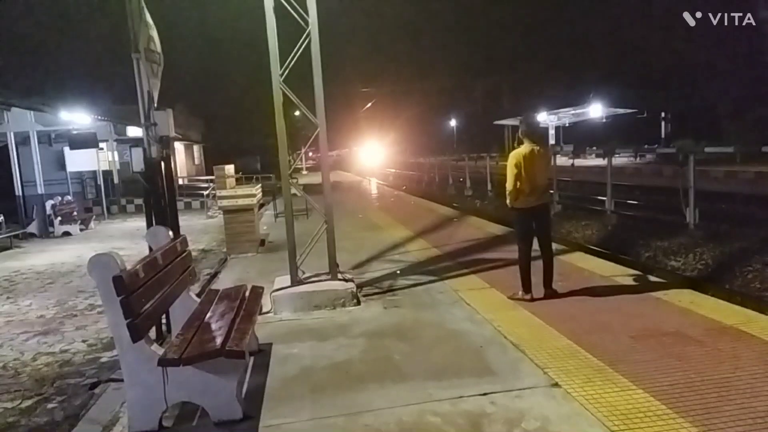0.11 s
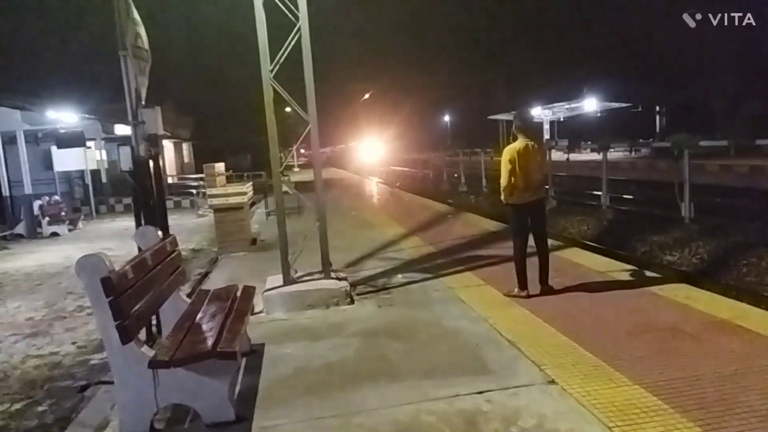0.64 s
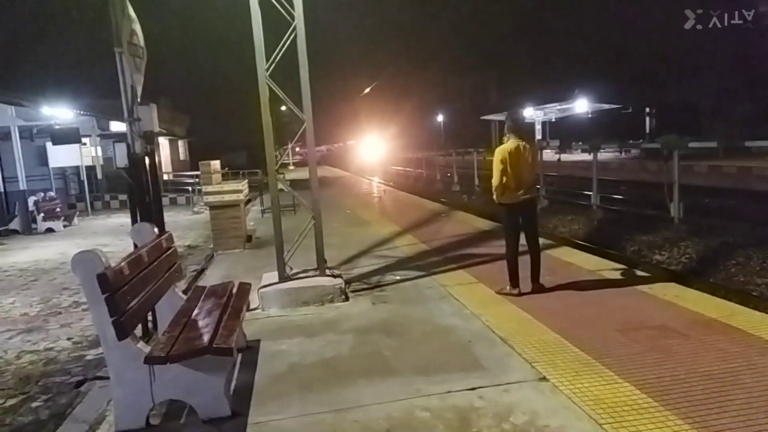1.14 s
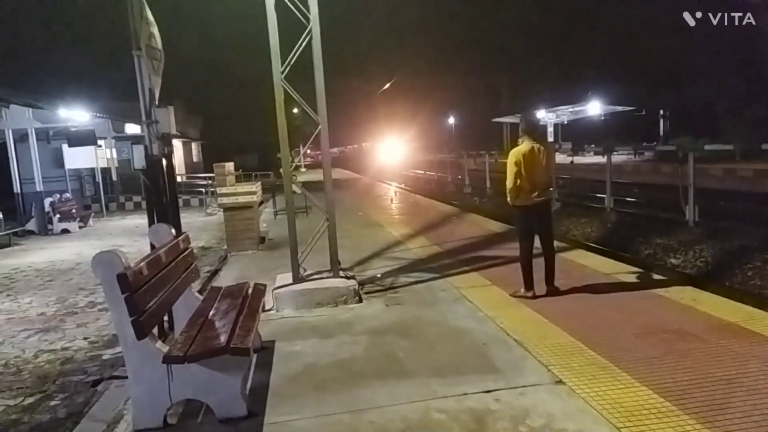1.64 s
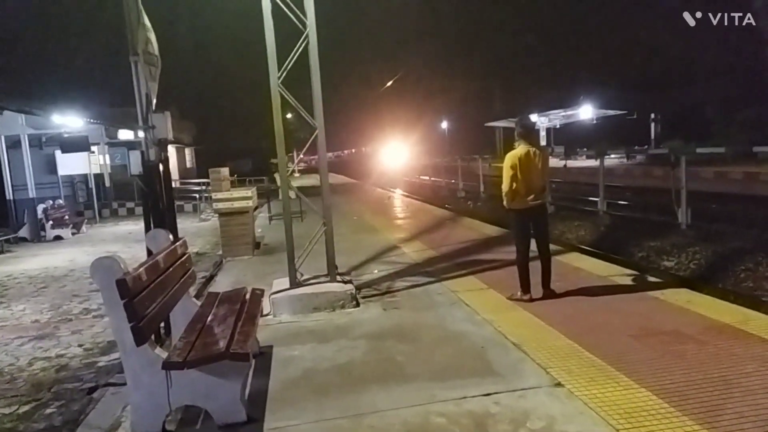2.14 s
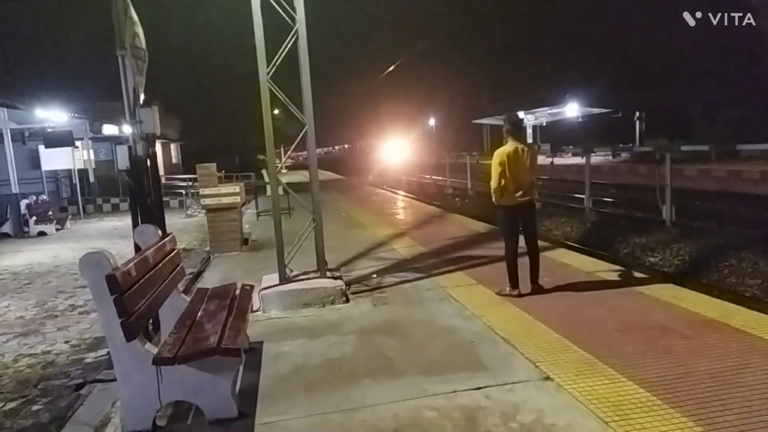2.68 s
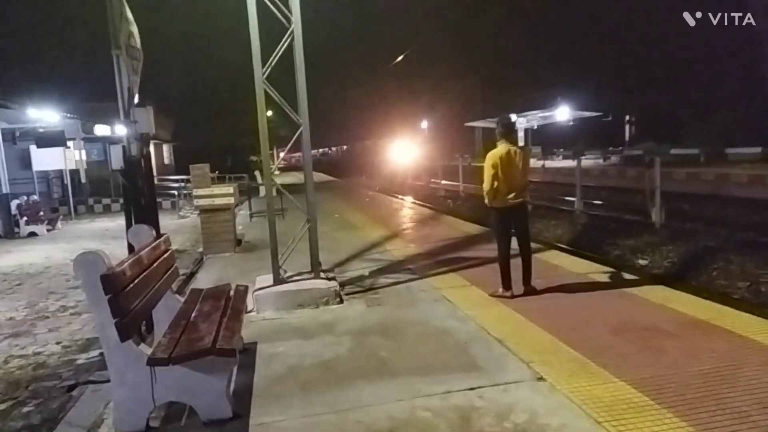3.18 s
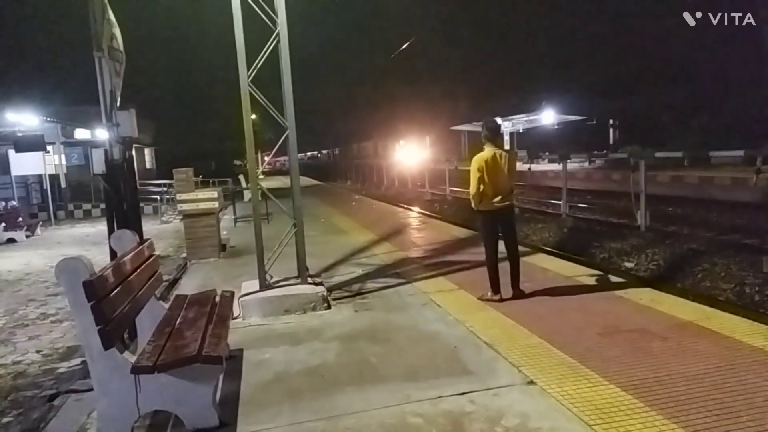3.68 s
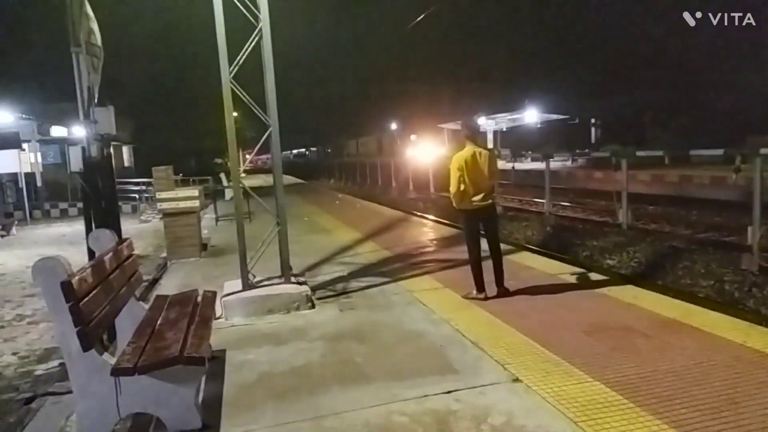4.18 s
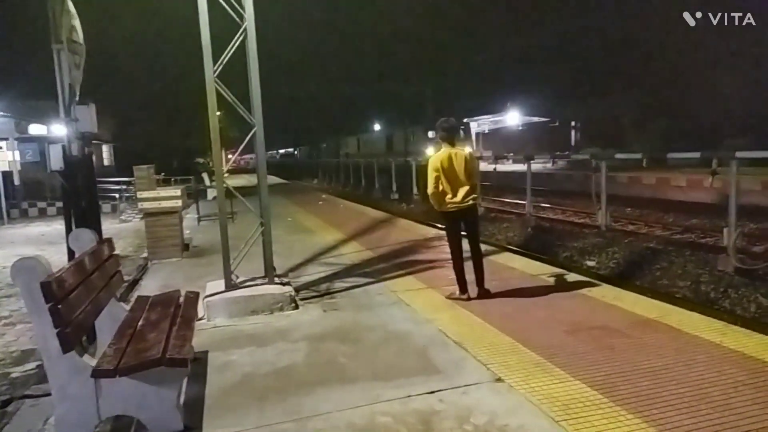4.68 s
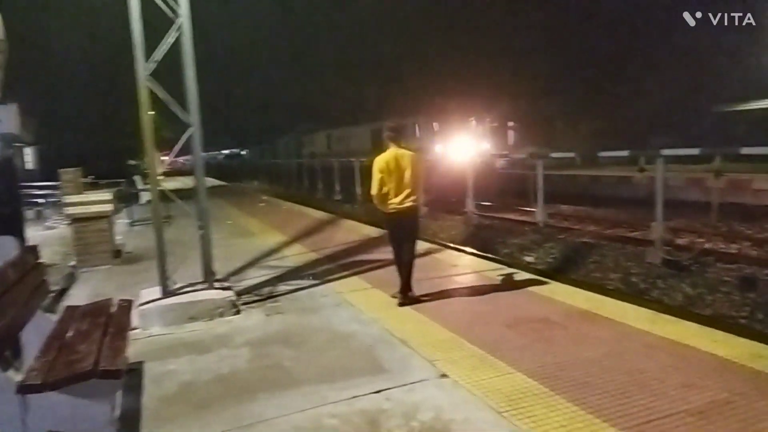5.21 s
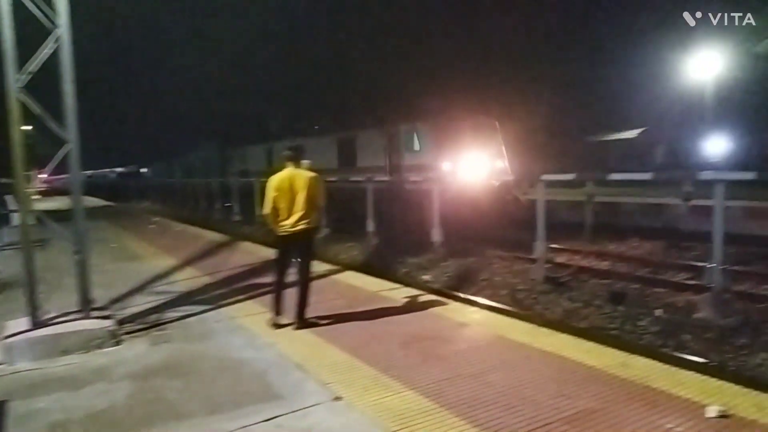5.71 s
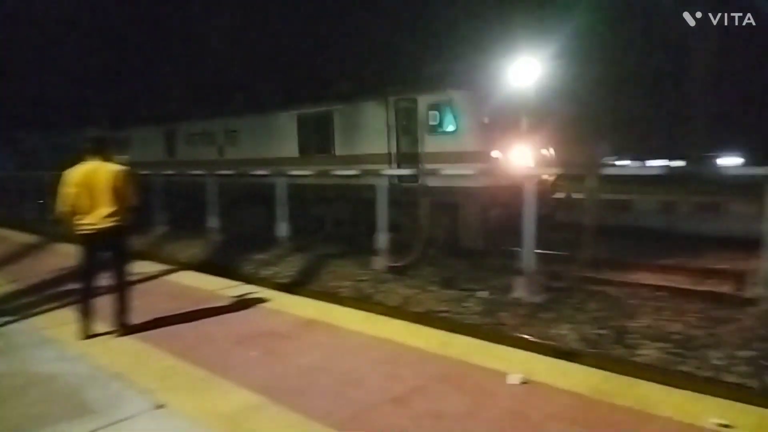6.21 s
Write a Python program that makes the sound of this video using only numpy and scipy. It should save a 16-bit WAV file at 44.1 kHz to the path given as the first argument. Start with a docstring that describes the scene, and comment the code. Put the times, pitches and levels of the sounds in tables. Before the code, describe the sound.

After a tiny silence, a night platform is heard: soft hiss, low rumble, a faint fading hum and narrow high crickets throbbing about eleven times a second. At 0.25 s a train horn begins to speak, with a small dull click near 0.33 s. By 0.6 s it is a round, mellow note a little above 300 Hz, sagging in level around 1.6 s and recovering. At about 1.9 s it snaps wide open: bright, brassy and sharp, briefly gritty until 2.4 s. The crickets and hiss are buried. The steady blast holds to 6 s, its overtones shimmering, swelling and dipping separately with wide open-air echoes. The train's rolling noise and wheel rumble build, especially after 5 s. Around 6.05 s the brass edge drops away, leaving a mellower note, with a brief rumble surge near 6.3 s as the sound ends mid-approach.

```python
"""A locomotive's air horn, from a station platform at night as the train rolls in: first half open, round and
mellow, then wide open, brassy and sharp. It is built from partials in step, one slap of the diaphragm a cycle;
echoes from track, fence and roofs make every overtone swell and fade on its own. Crickets (throbbing narrow
hiss), a fading station hum (a sine) and night hiss lie underneath, with a low rumble. The rolling noise of the
train, banded noise that follows its distance, grows at the end."""
import sys
import numpy as np
from scipy import signal
from scipy.io import wavfile
from scipy.ndimage import uniform_filter1d

SR = 44100
rng = np.random.default_rng(int(sys.argv[2]) if len(sys.argv) > 2 else 0)


def generate_wav(sig):
    """Save sig (samples, or channels by samples) to the path in sys.argv[1] as 16-bit PCM at SR."""
    pcm = np.round(np.clip(np.atleast_2d(sig).T, -1, 1) * 32767).astype(np.int16)
    wavfile.write(sys.argv[1], SR, pcm)


def level_to_linear(level):
    """Convert decibel levels to linear amplitude factors, elementwise."""
    exponent = np.asarray(level, float) / 20
    return 10 ** exponent


N = 279594
STEP = 64   # samples between points of the coarse time grid

# the horn's note as it is heard on the platform: time_s, pitch_hz
NOTE_PITCH = [(0.36, 320.2), (0.61, 315.3), (1.0, 313.4), (1.55, 317.6), (2.0, 309.3), (3.17, 308.5),
              (4.88, 307.8), (5.67, 307), (5.9, 304.9), (6.3, 314.2)]

VALVE_OPENS_S = 0.256   # the horn begins to speak, half open
WIDE_OPEN_S, CLOSING_S, VALVE_SWING_S = 1.86, 6.05, 0.044   # the valve is wide open between the first two
NEARING_S = 2.24   # time in which echo lags and their creep double as the train nears
SLIP_HZ = 0.1   # creep of the echo paths at the start, wavelengths of the note per s


def rms_one(x):
    """Scales a sound to rms 1."""
    return x / np.sqrt(np.mean(np.abs(x) ** 2) + 1e-20)


def band_rms_one(x, low_hz, high_hz):
    """Scales a sound so that one band of its mid has rms 1."""
    band = signal.sosfilt(signal.butter(4, [low_hz, high_hz], "band", fs=SR, output="sos"), x.mean(0))
    return x / np.sqrt(np.mean(band ** 2))


def seconds(step=1):
    """Time of every step-th sample."""
    return np.arange(0, N + step - 1, step) / SR


def in_time(rows, step=1):
    """Draws straight lines in time through the columns of a table that starts with seconds."""
    s, *columns = np.transpose(rows)
    return [np.interp(seconds(step), s, column) for column in columns]


def at_hz(points, hz):
    """Reads a table of (Hz, value) along log frequency."""
    table_hz, values = np.transpose(points)
    return np.interp(np.log(hz), np.log(table_hz), values)


def fine(coarse):
    """From the coarse time grid to every sample."""
    return np.interp(np.arange(N) / STEP, np.arange(len(coarse)), coarse)


def drift(rate_hz):
    """Slow complex chance on the coarse grid: noise through a double one-pole low-pass, rms 1."""
    r = np.exp(-2 * np.pi * rate_hz * STEP / SR)
    white = rng.standard_normal((2, N // STEP + 1002))
    slow = signal.lfilter([1], [1, -2 * r, r * r], white[0] + 1j * white[1])
    return rms_one(slow[1000:])   # the filter has settled


def flutter(width_hz, edge_hz):
    """Quick complex chance that falls off and then stops: it hugs a partial and leaves the gaps dark."""
    white = rng.standard_normal((2, N // STEP + 102))
    slope = signal.butter(2, width_hz, fs=SR / STEP, output="sos")
    edge = signal.butter(6, edge_hz, fs=SR / STEP, output="sos")
    return rms_one(signal.sosfilt(np.vstack([slope, edge]), white[0] + 1j * white[1])[100:])


def banded_noise(spectrum, patchy_db):
    """Half-octave bands of stereo noise, each with its own level, flicker and left-right likeness."""
    # how alike both channels hear the noise: frequency_hz, likeness (0-1)
    channel_likeness = [(30, .2), (60, 0.83), (150, 1), (1000, 0.82), (4000, 0.3), (15000, 0.76)]
    out = 0
    edges = 25 * 2 ** np.arange(0, 9.6, 0.5)
    white = rng.standard_normal((2, 2, N))   # neighbouring bands take turns
    for k, (low, high) in enumerate(zip(edges, edges[1:])):
        hz = np.sqrt(low * high)
        if not spectrum[0][0] <= hz <= spectrum[-1][0]:
            continue
        band = signal.butter(2, [low, high], "band", fs=SR, output="sos")
        mid, side = signal.sosfilt(band, white[k % 2])
        alike = np.clip(at_hz(channel_likeness, hz), 0, 1)
        gain = level_to_linear(at_hz(spectrum, hz) + patchy_db * fine(drift(6.3).real))
        out = out + gain * (np.sqrt(1 + alike) * mid + np.sqrt(1 - alike) * side * [[1], [-1]])
    return out


def hardness(step=STEP):
    """0 with the valve half open, 1 wide open."""
    t = seconds(step)
    return np.clip(np.minimum(t - WIDE_OPEN_S, CLOSING_S - t) / VALVE_SWING_S, 0, 1)


def nearness(step=STEP):
    """Starts at 1 and doubles steadily as the train comes in."""
    return 2 ** (seconds(step) / NEARING_S)


def train_closeness():
    """10 m over the train's distance, on a straight path past the listener."""
    pass_s, speed_m_per_s, track_m = 6.45, 18, 7   # when, how fast and how near it would pass
    return 10 / np.hypot(track_m, speed_m_per_s * (pass_s - seconds()))


def ducking_db():
    """The station sounds sink at once under the full blast and come back slowly."""
    depth_db, recovers_db_per_s = -42, 69
    climb = recovers_db_per_s * seconds()
    return np.minimum.accumulate(depth_db * hardness(step=1) - climb) + climb


def station_hum():
    """One pure station tone that fades."""
    hum_hz, start_db, fade_db_per_s = 446, -54, -8
    t = seconds()
    return level_to_linear(start_db + fade_db_per_s * t) * np.sqrt(2) * np.sin(2 * np.pi * hum_hz * t)


def night_hiss():
    """The hiss of the night: wide noise that lifts a little with the horn and sinks under the full blast."""
    # colour of the night air, relative: frequency_hz, density_db (per Hz)
    night_colour = [(140, -44), (240, -12), (359, -15), (451, -8.5), (1220, -15), (1360, -18.5),
                    (1860, -27.5), (4550, -22), (5720, -38), (6700, -26), (15800, -28.5)]
    band_db, lift_db = -48.5, 0.5   # level of the band 400-540 Hz; rise as the horn begins
    hiss = band_rms_one(banded_noise(night_colour, patchy_db=1.5), 400, 540)
    lift = lift_db * np.clip((seconds() - VALVE_OPENS_S) / 0.12, 0, 1)
    return level_to_linear(band_db + lift + ducking_db()) * hiss


def low_rumble():
    """Station rumble and the wheels' low noise, which grows as distance shrinks, added in power."""
    # colour of the rumble, relative: frequency_hz, density_db (per Hz)
    rumble_colour = [(15, -45), (25, -9), (59, -17), (92, -2.5), (144, -2.5), (204, -10), (260, 1.5),
                     (340, -73), (570, -120)]
    station_db, wheels_db = -48, -45   # level of the band 50-230 Hz; the wheels' at 10 m
    ducking_share = 0.29   # the station rumble sinks by this share of the ducking
    surge_s, surge_db, surge_half_s = 6.29, 6.9, 0.057   # the wheels' rumble surges once
    surge = level_to_linear(surge_db * np.exp(-((seconds() - surge_s) / surge_half_s) ** 2))
    steep = signal.butter(4, 300, fs=SR, output="sos")
    noise = band_rms_one(signal.sosfilt(steep, banded_noise(rumble_colour, patchy_db=2.0)), 50, 230)
    station = level_to_linear(station_db + ducking_share * ducking_db())
    wheels = level_to_linear(wheels_db) * train_closeness() * surge
    return np.hypot(station, wheels) * noise


def rolling_noise():
    """The train's middle noise: it grows faster than one over the distance and sinks under the full blast."""
    # colour of the rolling train, relative: frequency_hz, density_db (per Hz)
    rolling_colour = [(240, -49), (500, -15), (900, 5.5), (1500, -12.5), (3000, -15), (5000, -20.5),
                      (8000, -23), (15800, -43)]
    band_db = -45   # level of the band 400-540 Hz at 10 m, without ducking
    ducking_share, swell_power = 0.4, 1.5
    noise = band_rms_one(banded_noise(rolling_colour, patchy_db=1.5), 400, 540)
    return level_to_linear(band_db + ducking_share * ducking_db()) * train_closeness() ** swell_power * noise


def crickets(depth):
    """A throbbing hiss in one narrow wing resonance, its beat drifting a little."""
    level_db, wing_hz, width_hz, chirps_per_s = -47, 6730, 590, 11   # level without ducking
    edges = [wing_hz - width_hz / 2, wing_hz + width_hz / 2]
    wing = signal.butter(2, edges, "band", fs=SR, output="sos")
    hiss = signal.sosfilt(wing, rng.standard_normal((2, N)))
    beat = np.cumsum(chirps_per_s * (1 + 0.089 * fine(drift(1.6).real))) / SR
    throbbing = rms_one(hiss * (1 + depth * np.sin(2 * np.pi * beat)))
    return level_to_linear(level_db + ducking_db()) * throbbing


def tick():
    """One short dull click as the horn speaks: an impulse through two decays."""
    tick_s, peak_db = 0.3343, -14
    out = np.zeros(N)
    out[round(tick_s * SR)] = level_to_linear(peak_db)
    return signal.lfilter([1, -1], [1, -1.78, 0.79], out)


def ground_comb(k, hz, t):
    """The upside-down echo off the ground combs all partials but the first."""
    lag_cycles, height = 0.03715, 0.36   # lag at the start, in cycles of the note
    blur_hz = 5560   # rough ballast scatters the echo more and more towards and above this
    from_s, grows_s = 2.18, 1.0   # the echo sets in as the track straightens
    grown = np.clip((t - from_s) / grows_s, 0, 1)
    bounce = height * grown * (k > 1) * np.exp(-hz / blur_hz)[:, None]
    return np.abs(1 - bounce * np.exp(-2j * np.pi * k * lag_cycles * nearness()))


def low_partial_levels(note_db, edge_db, hard, t):
    """Partials 1-5 in dB: blends of note and brass edge, each with swells and dips of its own."""
    # 2nd to 5th partial: share of the note (0-1), half_open_db, wide_open_db
    low_blends = [(0.7, -2.5, -0.5), (0.81, -15.5, -6.5), (0.83, -17.5, -7.5), (0.39, -13.5, -6.5)]
    # one low partial swells or dips for a while: centre_s, partial number, change_db, half_length_s
    partial_swells = [(0.466, 4, -11, 0.12), (1.318, 3, -28, 0.043), (1.48, 2, -2, 0.31),
                      (1.534, 4, -12, 0.13), (1.83, 3, 8.5, 0.058), (2.012, 5, -14, 0.072),
                      (2.072, 4, -10.5, 0.027), (2.19, 5, -2, 0.26), (2.258, 2, -1, 0.1),
                      (2.917, 4, -5.5, 1), (3.126, 1, 2, 0.067), (3.203, 2, -8.5, 0.46),
                      (3.434, 4, -2, 0.28), (3.595, 1, -4.5, 0.07), (3.817, 1, 1.5, 0.02),
                      (4.043, 3, -8.5, 0.23), (4.103, 2, -15.5, 0.37), (4.26, 4, -6, 0.54),
                      (4.543, 2, 2, 0.027), (4.65, 3, 6, 0.2), (4.796, 5, 4.2, 0.37), (5.022, 3, -4, 0.085),
                      (5.07, 2, -16, 0.33), (5.32, 3, 1.5, 0.32), (5.797, 3, -32, 0.028),
                      (5.813, 4, 5, 0.64), (5.926, 2, 6, 0.18), (6.018, 5, 8, 0.14), (6.161, 3, 1.5, 0.94),
                      (6.273, 1, -38, 0.01)]
    low = [note_db]
    for share, half, wide in low_blends:
        blend = share * note_db + (1 - share) * edge_db
        low.append(blend + half + (wide - half) * hard)
    for s, partial, db, length in partial_swells:
        i = round(partial) - 1
        low[i] = low[i] + db * np.exp(-((t - s) / length) ** 2)
    return np.array(low)


def brass_colour(hz, hard):
    """Relative heights of the upper partials, from mellow to brassy as the valve opens, dulled by far air."""
    # valve half open, relative: frequency_hz, level_db
    mellow_colour = [(1890, -0.5), (2200, -6), (3140, -7), (3450, -13), (3770, -66), (4400, -16),
                     (5030, -28), (6000, -18.5), (6600, -15.5), (7300, -27), (8500, -28), (9800, -19.5),
                     (11700, -21.5), (15700, -27)]
    # valve wide open, relative: frequency_hz, level_db
    brassy_colour = [(1000, -34), (1700, -6.5), (2130, -2.5), (2490, -4.5), (3150, -4.5), (3900, -11),
                     (4660, -6), (5990, -11), (6890, -9.5), (7490, -16), (8460, -8.5), (11900, -9),
                     (15800, -16)]
    air_loss_db = -5   # tilt at 10 kHz at the start, shrinking as the train nears
    blend = np.outer(at_hz(mellow_colour, hz), 1 - hard) + np.outer(at_hz(brassy_colour, hz), hard)
    return level_to_linear(blend) * level_to_linear(air_loss_db * np.outer(hz / 10000, 1 / nearness()))


def brass_flares(hz, t):
    """Stretches of the brass that flare or dull for a while, in dB."""
    # centre_s, centre_hz, change_db, half_length_s
    flare_rows = [(2.347, 3170, 5.5, 0.67), (2.75, 9200, -5.5, 0.19), (3.996, 6640, 3.5, 0.12),
                  (4.087, 3400, 5, 0.2), (4.713, 10700, -5, 0.12), (5.286, 2600, -3, 0.19),
                  (5.75, 9700, 4, 0.13), (.95, 4500, -6.5, 0.25), (3.276, 1820, -6, 0.054),
                  (4.24, 2300, -8, 0.12), (4.753, 1850, -2.5, 0.18), (4.4, 11300, -2, .1)]
    octaves = 0.19   # half width of each stretch
    total_db = 0
    for s, at, db, length in flare_rows:
        stretch = np.exp(-(np.log2(hz / at) / octaves) ** 2)
        total_db = total_db + db * np.outer(stretch, np.exp(-((t - s) / length) ** 2))
    return total_db


def overtone_levels(count):
    """Height of every partial: mellow, then brassy while the valve is wide open, combed by the ground echo."""
    # the horn's air: time_s, note_db, edge_db (of the brass edge)
    horn_air = [(0.24, -47, -62), (0.31, -34, -71), (0.39, -16.5, -57), (0.48, -14, -36.5),
                (0.6, -10.5, -26), (0.71, -7.5, -22), (1.2, -8, -23.5), (1.4, -10.5, -29),
                (1.58, -14.5, -39.5), (1.72, -8.5, -21), (1.82, -9, -24), (1.92, -19.5, -21.5),
                (2.14, -21, -21), (2.26, -19.5, -20.5), (3.0, -19.5, -20), (3.7, -19, -19.5),
                (4.1, -16, -17), (4.35, -16.5, -17.5), (4.7, -18.5, -21.5), (5.5, -16.5, -19.5),
                (5.97, -16, -19.5), (6.08, -13.5, -32.5), (6.22, -18.5, -35.5), (6.33, -20, -45)]
    second_speaks_s = 0.335   # the low overtones enter with the tick
    brass_speaks_s, brass_attack_s = 0.447, 0.027   # the upper overtones enter together
    note_db, edge_db = in_time(horn_air, step=STEP)
    hard, t = hardness(), seconds(STEP)
    k = np.arange(1, count + 1)[:, None]
    hz = k[:, 0] * np.mean(NOTE_PITCH, axis=0)[1]
    comb = ground_comb(k, hz, t)
    low = level_to_linear(low_partial_levels(note_db, edge_db, hard, t)) * comb[:5]
    low = low * ((k[:5] < 2) | (t > second_speaks_s))
    high = brass_colour(hz[5:], hard) * comb[5:]
    high = high / np.linalg.norm(high, axis=0) * level_to_linear(edge_db + brass_flares(hz[5:], t))
    high = high * np.clip((t - brass_speaks_s) / brass_attack_s, 0, 1)
    return np.sqrt(2) * np.vstack([low, high])   # from rms to peak


def echo_paths(size, count, wander_hz, flat_hz=0):
    """Lag of each echo in radians of the note; it creeps one way or the other as the train moves."""
    slip = SLIP_HZ * nearness()[:size]
    speed = [slip * drift(wander_hz).real[:size] + flat_hz * rng.random() for _ in range(count)]
    return 2 * np.pi * (rng.random((count, 1)) + np.cumsum(speed, axis=1) * STEP / SR)


def horn(far_echo_db, echo_db, low_echo_db, flutter_db, low_flutter_db, far_flutter_db, flutter_hz, edge_hz,
         low_sway, skew):
    """The diaphragm slaps once a cycle: partials in step, joined by echoes of the slap from all round."""
    # stereo width: frequency_hz, side_over_mid_db
    stereo_width = [(60, -6), (130, -8), (290, -23.5), (640, -13), (1410, -5.5), (3100, -4.5), (6820, -9.5),
                    (15000, -12)]
    # stereo balance: frequency_hz, left_over_right_db
    stereo_lean = [(60, -2.0), (130, -1.5), (290, 0), (640, 0), (1410, 4.5), (3100, -5), (6820, 4),
                   (15000, -5)]
    behind_hz = 4.5   # echoes from walls behind the horn sound flat, up to this much on the first partial
    behind_tilt_db = -1.5   # per partial: walls return the long waves best
    turn = np.exp(2j * np.pi * np.cumsum(in_time(NOTE_PITCH)[0]) / SR)
    levels, wave, out = overtone_levels(count=50), 1, np.zeros((2, N))
    size = min(levels.shape[1], N // STEP + 2)
    hard, slip = hardness()[:size], SLIP_HZ * nearness()[:size]
    high_echo_db = far_echo_db + (echo_db - far_echo_db) * hard   # the full blast wakes more echoes
    ahead = echo_paths(size, count=6, wander_hz=0.3)
    sides = echo_paths(size, count=6, wander_hz=0.393)
    behind = echo_paths(size, count=5, wander_hz=0.317, flat_hz=behind_hz)
    for k, level in enumerate(levels[:, :size], 1):
        wave = wave * turn
        hz = k * np.mean(NOTE_PITCH, axis=0)[1]
        if k < 6:
            echo, paths = level_to_linear(low_echo_db + behind_tilt_db * k) * hard, behind
        else:
            echo, paths = level_to_linear(high_echo_db), ahead
        # unsteady air roughens the high partials most
        rasp_db = low_flutter_db + (flutter_db - low_flutter_db) * min(k / 7.44, 1)
        rasp = level_to_linear(rasp_db + far_flutter_db * (1 - hard))
        left, right = [rasp * flutter(flutter_hz, edge_hz)[:size] for _ in range(2)]
        # long waves bend round the station and arrive shifted
        phase = skew + (k < 6) * low_sway * slip * drift(0.26).real[:size]
        usual = uniform_filter1d(level, size=70)   # echoes do not share the nulls of the direct sound
        echoes = usual * echo * rms_one(np.exp(-1j * k * paths).sum(0))
        mid = (level + echoes) / np.sqrt(1 + echo ** 2)
        side = usual * level_to_linear(at_hz(stereo_width, hz)) * rms_one(np.exp(-1j * k * sides).sum(0))
        lean = level_to_linear(at_hz(stereo_lean, hz) / 2)
        out[0] += (fine(lean * (mid + side + usual * left) * np.exp(1j * phase)) * wave).real
        out[1] += (fine((mid - side + usual * right) / lean * np.exp(1j * phase)) * wave).real
    return out * np.clip((seconds() - VALVE_OPENS_S) / 0.03, 0, 1)


def grit(blast, jitter_hz, jitter_s):
    """The tone turns briefly gritty: fast jitter of height and time, with low noise."""
    # when the tone is gritty: start_s, end_s, depth (0-1), low_noise_db
    gritty_spells = [(1.873, 1.94, 0.14, -57), (2.017, 2.225, 0.18, -42), (2.353, 2.393, 0.12, -46)]
    # colour of the low noise, relative: frequency_hz, density_db (per Hz)
    low_noise_colour = [(25, -7), (45, 1), (65, 19), (100, -28), (200, -5), (400, -19), (800, -30)]
    depth, low_gain, t = np.zeros(N), np.zeros(N), seconds()
    for start, end, share, db in gritty_spells:
        gate = np.clip(np.minimum(t - start, end - t) / 0.01, 0, 1)
        depth += share * gate
        low_gain += level_to_linear(db) * gate
    jitter = signal.butter(2, jitter_hz, fs=SR, output="sos")
    height, late = signal.sosfilt(jitter, rng.standard_normal((2, N)))
    moment = t - jitter_s * depth * rms_one(late)
    shifted = np.array([np.interp(moment, t, channel) for channel in blast])
    low_noise = low_gain * rms_one(banded_noise(low_noise_colour, patchy_db=1.0))
    return shifted * (1 + depth * rms_one(height)) + low_noise


def scene():
    """The platform at night with the horn in front, after a moment of silence."""
    start_s = 0.062
    background = station_hum() + night_hiss() + low_rumble() + rolling_noise()
    blast = horn(far_echo_db=-4.5, echo_db=-4.0, low_echo_db=-10.0, flutter_db=-6.5, low_flutter_db=-19.5,
                 far_flutter_db=-9.0, flutter_hz=33, edge_hz=110, low_sway=1.75, skew=0.67)   # skew in radians
    gritty_blast = grit(blast, jitter_hz=225, jitter_s=0.00008)
    sound = background + crickets(depth=0.66) + tick() + gritty_blast
    return sound * np.clip((seconds() - start_s) / 0.0061, 0, 1)


def top_cut(x):
    """Nothing passes above the cut-off."""
    return signal.sosfilt(signal.butter(12, 16050, fs=SR, output="sos"), x)


def record(dry):
    """Peaks are rounded and the deepest bass is cut."""
    rounded = 0.85 * np.tanh(dry / 0.85)
    cut = signal.sosfilt(signal.butter(3, 40, "high", fs=SR, output="sos"), rounded)
    return top_cut(cut)


dry = scene()
out = record(dry)
generate_wav(out)
```